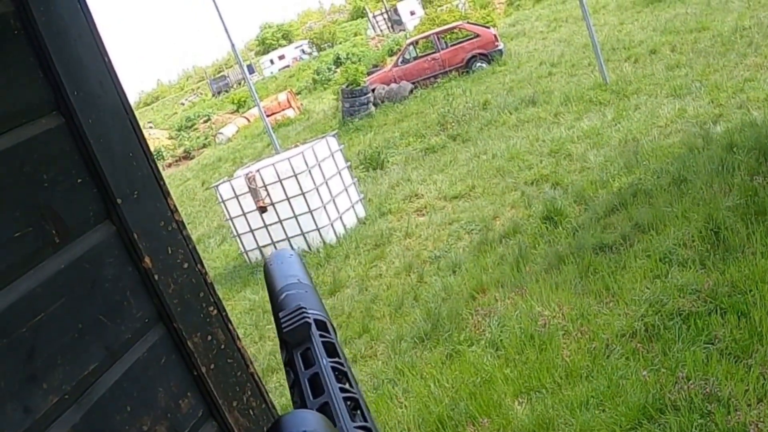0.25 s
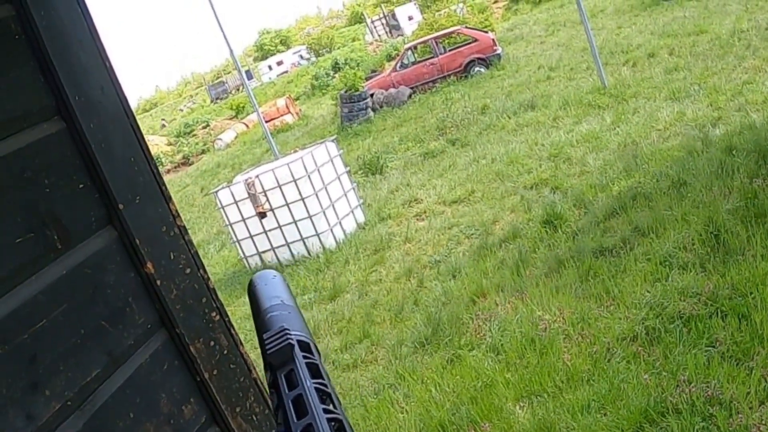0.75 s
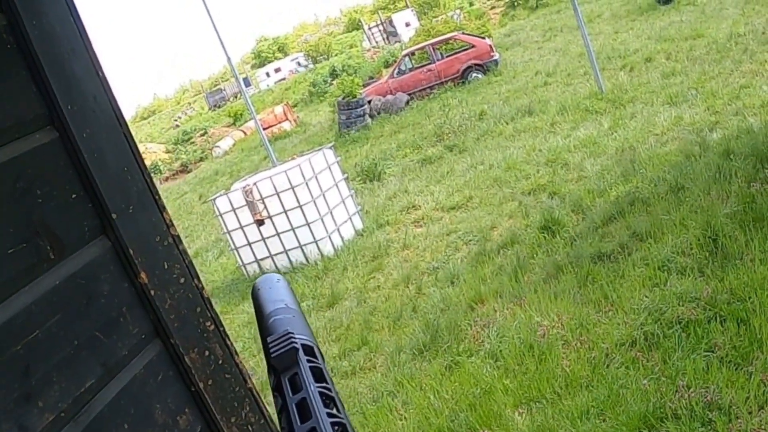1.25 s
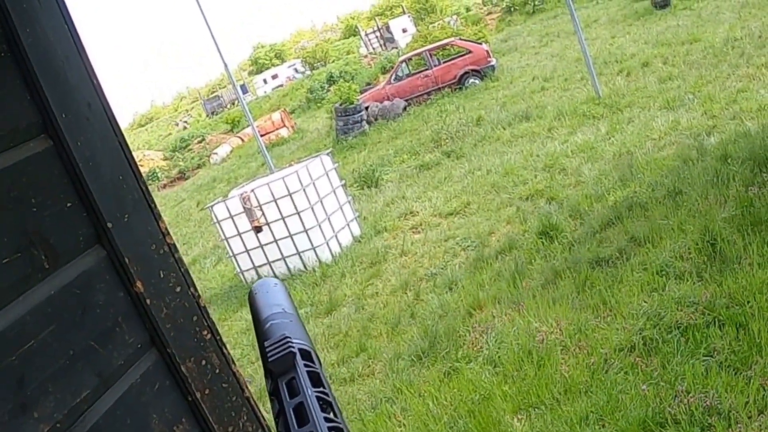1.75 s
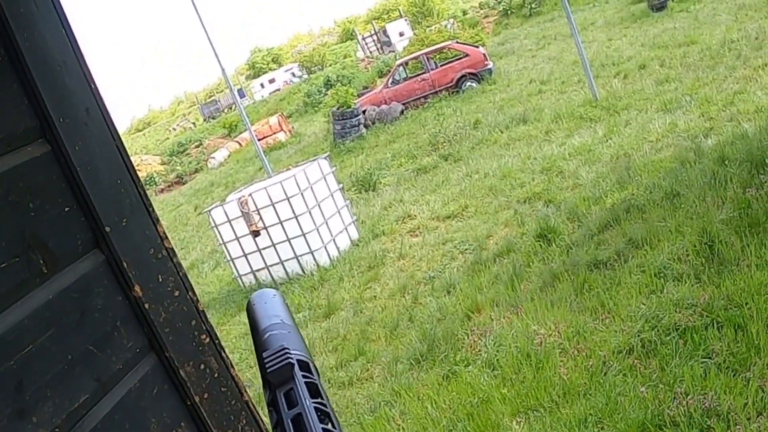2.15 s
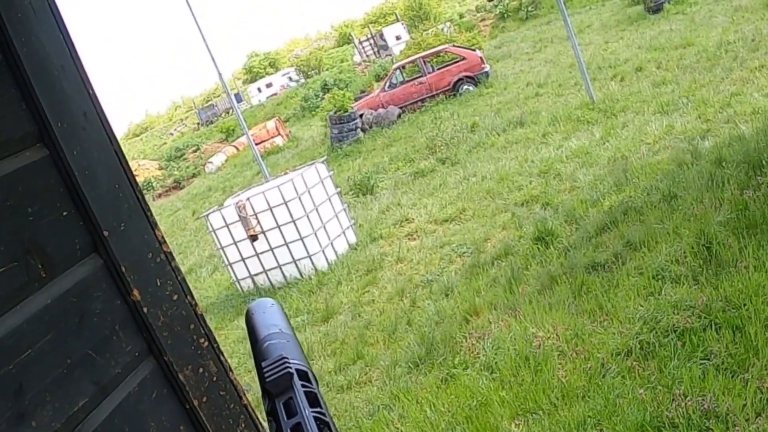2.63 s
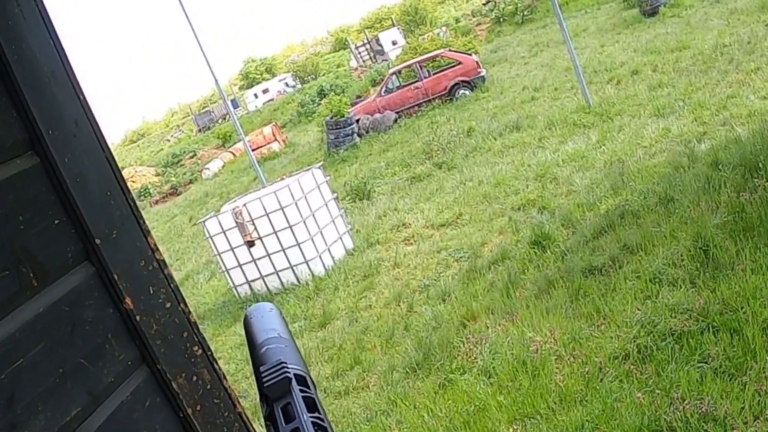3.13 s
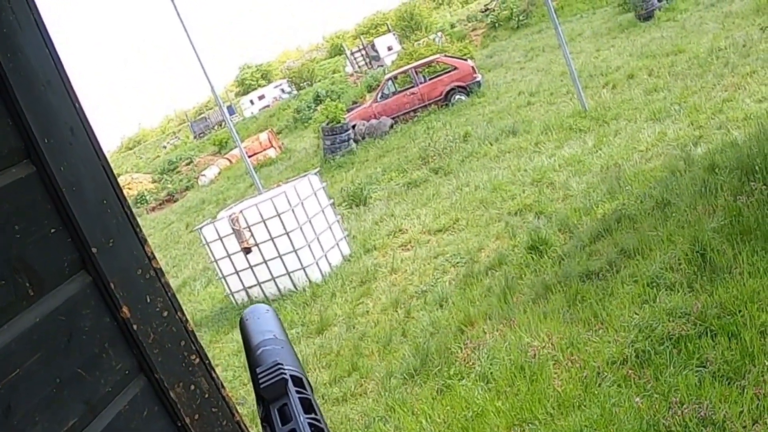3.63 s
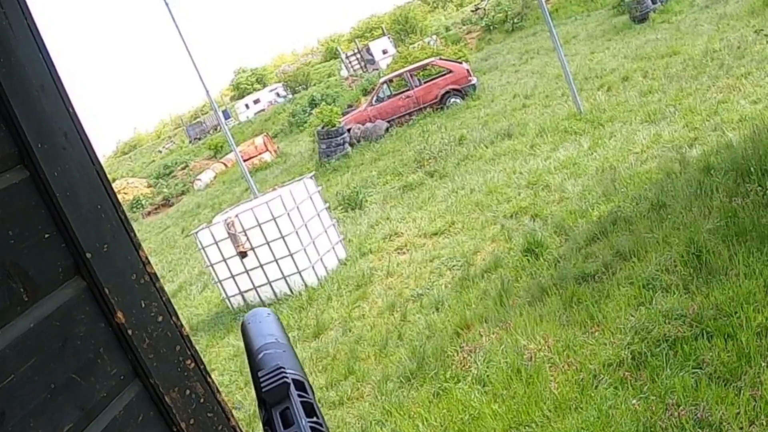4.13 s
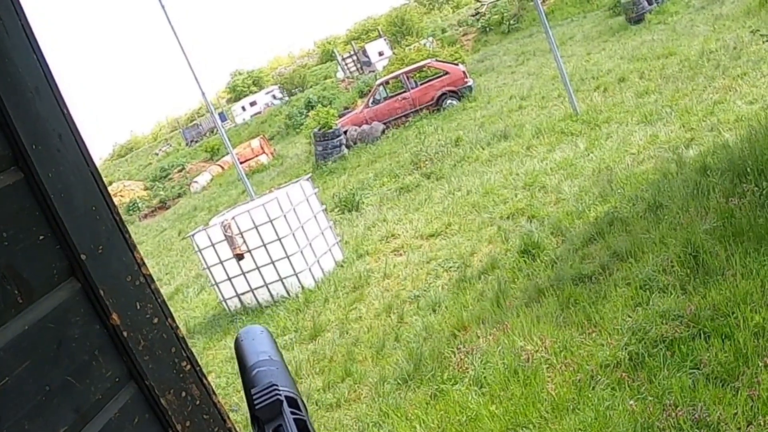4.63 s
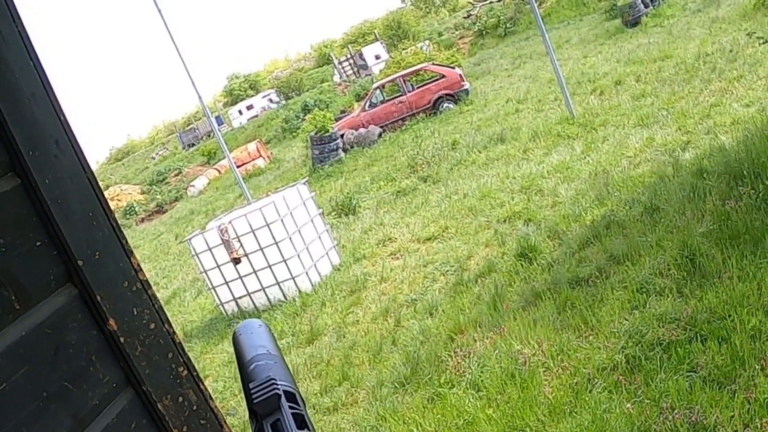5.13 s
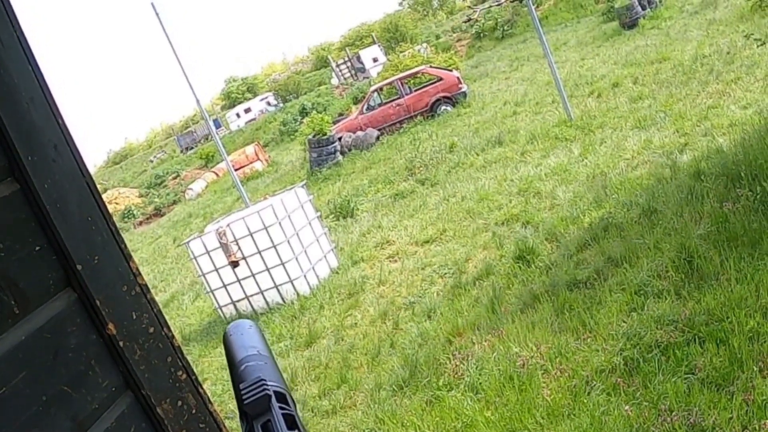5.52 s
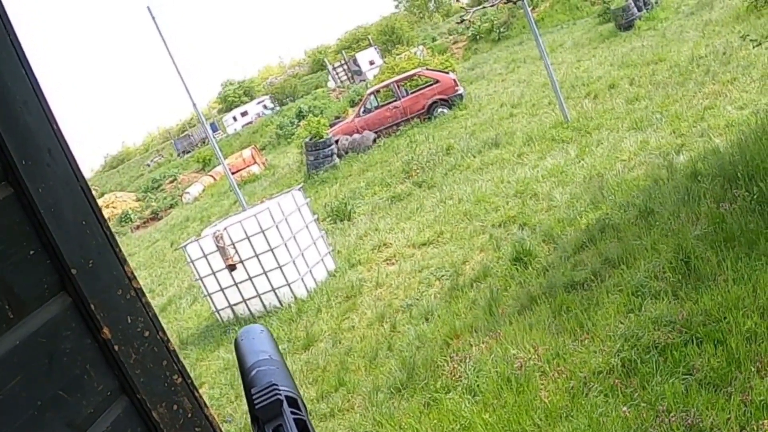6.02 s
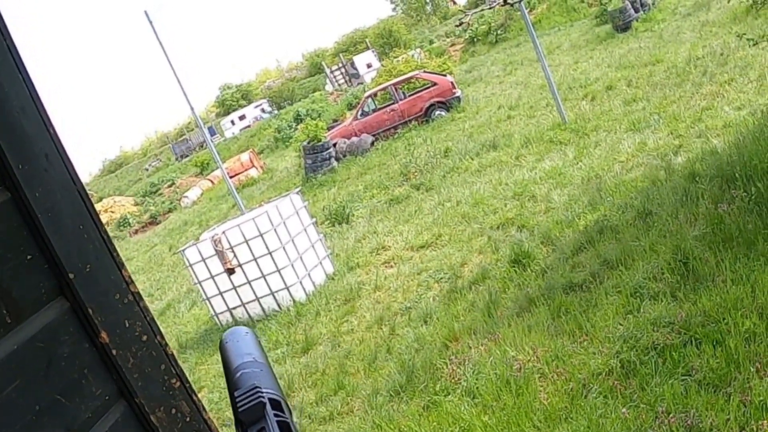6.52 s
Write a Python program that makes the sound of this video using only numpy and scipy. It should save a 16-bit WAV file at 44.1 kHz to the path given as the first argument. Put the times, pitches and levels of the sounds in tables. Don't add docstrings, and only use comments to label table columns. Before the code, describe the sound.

Fast, steady low thumps from a motorised launcher, each wound up by a short gear buzz, with plastic clatter and light handling noise between.

```python
import sys
import numpy as np
from scipy import signal
from scipy.fft import rfft, irfft, next_fast_len
from scipy.io import wavfile
from scipy.ndimage import uniform_filter1d

SR = 44100
rng = np.random.default_rng(int(sys.argv[2]) if len(sys.argv) > 2 else 0)


def file_out(sig):
    cols = np.atleast_2d(sig).T
    lim = np.clip(cols, -1, 1)
    pcm = np.round(lim * 32767).astype(np.int16)
    wavfile.write(sys.argv[1], SR, pcm)


def ratio_of_db(decibels):
    return 10 ** (np.asarray(decibels, float) / 20)


N = 298557

# (piston release [s], motor lead [ms], after-swing [dB],
# tube ring [dB])
PULLS = [(0.1301, 42, -24, -28), (0.3682, 46.4, -14.5, -23), (0.5811, 48.3, -19, -21.5),
         (0.7688, 26, -26, -23), (0.9817, 40, -23, -29), (1.1439, 44, -15.5, -30),
         (1.3316, 43, -18, -23.5), (1.4946, 45.4, -15.5, -27.5), (1.6598, 49, -17.5, -25.5),
         (1.8231, 45, -13.5, -28.5), (2.0375, 43, -18.5, -27.5), (2.2514, 41, -17.5, -30),
         (2.4146, 42, -23, -31), (2.5775, 49, -19, -30.5), (2.7158, 41, -14, -29),
         (2.9065, 65, -11.5, -30),
         (3.0464, 44, -16.5, -27), (3.2361, 36.5, -19, -25), (3.3999, 65, -15, -25.5),
                (3.5631, 46, -13.5, -27), (3.7292, 49, -17.5, -26), (3.8922, 43, -23, -29.5),
                (4.057, 37.4, -22, -24), (4.2462, 45, -14, -24.5), (4.4106, 51, -21.5, -28.5),
                (4.599, 39, -31, -25), (4.7882, 42.5, -17, -24), (4.9542, 41, -18, -31),
                (5.1435, 47.5, -32, -30.5), (5.3332, 43, -21, -22.5), (5.4968, 46, -22, -23.5),
                (5.6867, 36, -29, -25), (5.8784, 38, -20, -24.5), (6.0686, 62, -17, -24),
                (6.2575, 39, -16.5, -25.5), (6.4234, 48, -13.5, -24.5), (6.6143, 50, -20, -22.5)]
CYCLES = PULLS
# (time [s], peak [dB], knock below 500 Hz [dB])
RATTLES = [(0.0853, -5, -17), (0.178, -5, -20), (0.7153, -9.5, -59), (0.908, -32, -44), (1.213, -31, -32),
           (1.242, -38, -40), (1.5807, -17, -40), (1.902, -26.5, -42), (2.5562, -8.5, -16),
           (2.806, -19, -10), (2.8698, -8.5, -22), (2.987, -26, -24), (3.1065, -6.5, -25),
           (3.322, -17, -35), (3.3599, -9.5, -18), (3.587, -20.5, -18), (3.603, -11, -18),
           (3.649, -20.5, -18), (4.4261, -7.5, -26), (4.6948, -7, -38), (4.923, -9, -33),
           (5.1596, -12, -20), (5.4082, -31, -14), (5.5186, -8.5, -20), (5.763, -5.5, -22.5),
           (6.0321, -6, -20), (6.287, -12.5, -35), (6.3487, -21, -20), (6.509, -18.5, -38),
           (6.5377, -5.5, -58)]
THUD_DB, FIRMER_DB_PER_S = -8.5, 0.255


def rms_one(x):
    return x / np.sqrt(np.mean(x ** 2) + 1e-20)


def at_hz(points, hz):
    point_hz, value = np.array(points).T[:2]
    return np.interp(np.log(hz), np.log(point_hz), value)


def add(track, s, piece):
    i = max(int(s * SR), 0)
    track[i:i + len(piece)] += piece[:max(N - i, 0)]


def band(x, low_hz, high_hz):
    return signal.sosfilt(signal.butter(2, [low_hz, high_hz], "band", fs=SR, output="sos"), x)


def band_noise(white, first_hz, second_hz):
    return rms_one(band(band(white, *first_hz), *second_hz))


def flicker(rate_hz, depth_db):
    r = np.exp(-2 * np.pi * rate_hz / SR)
    wander = rms_one(signal.lfilter([1], [1, -2 * r, r * r], rng.standard_normal(N)))
    return ratio_of_db(depth_db * 1.4 * np.tanh(wander / 1.4))


def grit(rate_per_s, length_ms, level_db):
    grains = (rng.random(N) < rate_per_s / SR) * np.minimum(rng.exponential(1, N), 3)
    r = np.exp(-1000 / (length_ms * SR))
    fading = signal.lfilter([1], [1, -r], grains + 1e-18)
    return rms_one(1 + ratio_of_db(level_db) * uniform_filter1d(fading, size=30))


def swell(s, level_db, rise_db_per_s, fade_db_per_s):
    late = np.arange(0, N + 64, 64) / SR - np.array(s)[:, None]
    slope_db = np.minimum(rise_db_per_s * late, -fade_db_per_s * late)
    coarse = ratio_of_db(np.array(level_db)[:, None] + slope_db).sum(axis=0)
    return np.interp(np.arange(N) / 64, np.arange(len(coarse)), coarse)


def port_noise():
    # (frequency [Hz], level [dB per Hz])
    left_colour = [(300, -62.5), (700, -74), (1100, -68), (1800, -69), (2150, -80), (2700, -66.5),
                   (3800, -73), (5000, -78.5), (5600, -89), (7400, -87), (8600, -95), (10500, -100),
                   (13000, -105), (15600, -114)]
    right_colour = [(300, -78), (700, -73), (1100, -72.5), (1800, -69), (2150, -81), (2700, -74),
                    (4000, -80), (4800, -68), (5400, -79), (6600, -85), (7900, -108), (9500, -100),
                    (12500, -108), (15600, -120)]
    # (frequency [Hz], left-right likeness [0-1])
    likeness = [(300, 0.27), (700, 0.57), (1300, 0.8), (2100, 0.63), (3000, 0.8), (4200, 0.47),
                (6000, 0.47), (9000, 0.15)]
    # (frequency [Hz], left port lead [rad])
    left_lead = [(0, 0), (1890, 0.51), (2240, -2.5), (3450, -0.5), (4910, -2.5), (5940, -1.5), (6630, -5.5),
                 (7060, -11), (8100, -3), (9910, 6), (11500, -33.5), (15200, -7)]
    size = next_fast_len(N)
    hz = np.maximum(np.arange(size // 2 + 1) * SR / size, 1)
    shared, own = rfft(rng.standard_normal((2, size)))
    alike = np.clip(at_hz(likeness, hz), 0, 1)
    left = shared * ratio_of_db(at_hz(left_colour, hz))
    right = alike * shared * np.exp(-1j * at_hz(left_lead, hz)) + np.sqrt(1 - alike ** 2) * own
    right = right * ratio_of_db(at_hz(right_colour, hz))
    return rms_one(irfft(np.array([left, right]) * (hz > 350), size)[:, :N])


def shell(x, patchy_db):
    # (frequency [Hz], width [Hz], level [dB])
    resonances = [(1200, 76, 9), (1000, 77, 0.5), (1783, 147, 0.5), (2420, 130, 2), (3105, 55, -1),
                  (3603, 225, 1.5), (4243, 59, 3), (4887, 170, 0), (1423, 34, -5.5), (2894, 38, -9.5),
                  (5100, 85, -3.5), (5670, 120, -7.5), (7160, 750, -4), (9060, 170, -2)]
    out = x.copy()
    for hz, width_hz, level_db in resonances:
        r = np.exp(-np.pi * width_hz / SR)
        feedback = [1, -2 * r * np.cos(2 * np.pi * hz / SR), r * r]
        fed = x * flicker(26, patchy_db)
        out += ratio_of_db(level_db) * signal.lfilter((1 - r * r) / 2 * np.array([1, 0, -1]), feedback, fed)
    return out


def handling():
    # (time [s], hiss [dB], grip rumble [dB])
    slips = [(0.02, -31.5, -49), (0.148, -14.5, -57), (0.659, -24, -53), (0.808, -22, -63),
             (1.199, -43, -36), (1.66, -49, -27.5), (1.92, -53, -49), (2.24, -44, -59), (2.41, -42, -43),
             (2.5, -41.5, -54), (2.78, -39, -55), (2.98, -45, -36), (3.22, -28.5, -45), (3.42, -36, -34),
             (3.599, -30, -30), (4.05, -59, -57), (4.33, -44, -39), (4.662, -24.5, -52), (4.92, -24.5, -29),
             (5.22, -34, -62), (5.45, -36.5, -31), (5.721, -30.5, -43), (5.9, -33.5, -33), (5.99, -33, -48),
             (6.14, -50, -39), (6.319, -26.5, -38), (6.51, -30, -30.5), (6.66, -63, -32),
             (6.76, -35.5, -72)]
    slip_s, hiss_db, rumble_db = np.transpose(slips)
    rise_db_per_s, fade_db_per_s, linger_fade_db_per_s = 149.5, 204, 95
    breeze = ratio_of_db(-48.5) * np.clip((np.arange(N) / SR - 2.12) / 0.4, 0, 1)
    hiss = ratio_of_db(-65.5) + breeze + swell(slip_s, hiss_db, rise_db_per_s, fade_db_per_s)
    rumble = ratio_of_db(-59) + swell(slip_s, rumble_db, rise_db_per_s, fade_db_per_s)
    release, lead, after_db, tube_db = np.transpose(CYCLES)
    low = ratio_of_db(-43) + swell(release + 0.020, after_db - 10.5, 520.0, linger_fade_db_per_s)
    low = low + swell([0.14], [-22.5], 60., linger_fade_db_per_s)
    return hiss, rumble, low


def rattle_level(rise_ms, decay_ms):
    out, ms = np.zeros(N), np.arange(int(.15 * SR)) / SR * 1000
    burst = (1 - np.exp(-ms / rise_ms)) ** 2 * np.exp(-ms / decay_ms)
    for s, peak_db, knock_db in RATTLES:
        add(out, s, ratio_of_db(peak_db - 11.0) * burst)
    return out


def gear_level(start_db, rise_ms):
    gear_db, wind_db, slam_db = -32.5, -2.5, 3
    slam_end_ms, run_down_ms, run_down_db_per_ms, tail_db_per_ms = 31.8, 55, 0.53, 0.6
    crack_ms, crack_db, crack_fade_ms = 16, -2.5, 4.3
    down_ms = slam_end_ms + run_down_ms
    down_db = slam_db - run_down_db_per_ms * run_down_ms
    slam = [(-18.5, wind_db), (7.2, slam_db), (slam_end_ms, slam_db),
            (down_ms, down_db), (down_ms + 100, down_db - 100 * tail_db_per_ms)]
    out = np.zeros(N)
    for s, lead, after_db, tube_db in CYCLES:
        wind = [(-lead, -40), (-lead + rise_ms, start_db), (-.6 * lead, wind_db)]
        ms = np.arange(-lead, 200, 1000 / SR)
        level_db = gear_db + np.interp(ms, *np.array(wind + slam).T)
        crack = ratio_of_db(crack_db) * (ms > crack_ms) * np.exp(-np.abs(ms - crack_ms) / crack_fade_ms)
        add(out, s - lead / 1000, ratio_of_db(level_db) * (1 + crack))
    return uniform_filter1d(out, size=40)


def strike(modes, times, levels_db, spread_db, soft_hz):
    out, at = np.zeros(N), np.clip((np.array(times) * SR).astype(int), 0, N - 1)
    for hz, level_db, t60 in modes:
        clicks, draw = np.full(N, 1e-18), rng.standard_normal((len(at), 2))
        blows = ratio_of_db(levels_db + level_db + spread_db * draw[:, 0]) * np.sign(draw[:, 1])
        np.add.at(clicks, at, blows)
        r, w = ratio_of_db(-60 / (t60 * SR)), 2 * np.pi * hz / SR
        out += signal.lfilter([0, np.sin(w)], [1, -2 * r * np.cos(w), r * r], clicks)
    return signal.sosfilt(signal.butter(6, soft_hz, fs=SR, output="sos"), out)


def knocks(jitter_ms):
    # (frequency [Hz], level [dB], t60 [s])
    tube_modes = [(1193.7, 2.5, 0.091), (1257, -17.5, 0.2), (990, -26, 0.23), (1810, -14, 0.02),
                  (2990, -25, 0.13), (3510, -4, 0.016), (2605, -6.5, 0.024), (944, -11.5, 0.067)]
    handle_modes = [(250.2, -6.5, 0.22), (289.7, -4.5, 0.093), (204, 0.5, 0.017)]
    grip_modes = [(246.7, -2.5, 0.068), (282.6, -7.5, 0.056), (373, -22, 0.15), (196, -3, 0.031),
                  (440, -11, 0.042), (461, -13, 0.027)]
    # (time after release [ms], tube [dB], grip [dB])
    contacts = [
        (-30.5, -13, -7.5),
        (-20, -37, -1),
        (11, -0.5, 2.5),
        (17, -1.5, 2.5),
        (30.5, -32, 8.5),
        (42.5, -11, 1),
        (61.5, -16.5, -1),
    ]
    contact_ms, contact_tube_db, contact_grip_db = np.transpose(contacts)
    release, lead, after_db, tube_db = np.array(CYCLES).T[..., None]
    jitter = jitter_ms * rng.standard_normal((len(CYCLES), len(contacts)))
    times = (release + (contact_ms + jitter) / 1000).ravel()
    tube_level = (tube_db + contact_tube_db + 2.66).ravel()
    grip_level = (THUD_DB + FIRMER_DB_PER_S * release + contact_grip_db - 18.5).ravel()
    tube = strike(tube_modes, times, tube_level, spread_db=1.5, soft_hz=3670)
    grip = strike(grip_modes, times, grip_level, spread_db=2.0, soft_hz=585)
    motor_on = (release - lead / 1000).ravel() + 0.0021
    start = strike(handle_modes, motor_on, np.full(len(CYCLES), -25.), spread_db=3.5, soft_hz=510)
    rattle_s, peak_db, knock_db = np.transpose(RATTLES)
    light_db = np.minimum(knock_db, -20) - 1.5
    loose = strike(handle_modes, rattle_s, light_db, spread_db=0.5, soft_hz=380)
    return tube, grip + start + loose


def thuds(late_ms, spread_db):
    # (time after release [ms], signed height, start [Hz], end [Hz], rise [ms], decay [ms])
    swings = [
        (.4, .41, 94.2, 86.4, 3.5, 32.3),
        (10.2, 1.99, 142.4, 20.1, 24.4, 12.7),
        (21.1, .96, 69.2, 47.2, 7.7, 13.5),
        (32.5, -.55, 156.3, 179.7, 4.6, 11.9),
        (49.5, .17, 55.3, 76.2, .6, 38.3),
        (11.9, .11, 250, 240, .6, 6.5),
        (42.3, .08, 290, 280, .6, 5.5),
    ]
    out, ms = np.zeros(N), np.arange(int(.3 * SR)) / SR * 1000
    draws = rng.standard_normal((len(CYCLES), len(swings), 2))
    for (s, lead, after_db, tube_db), draw in zip(CYCLES, draws):
        peak_db = THUD_DB + FIRMER_DB_PER_S * s
        for (start, height, hz0, hz1, rise, decay), (dt, dg) in zip(swings, draw):
            turns = (hz1 * ms + (hz0 - hz1) * 25 * (1 - np.exp(-ms / 25))) / 1000
            envelope = (1 - np.exp(-ms / rise)) * np.exp(-ms / decay)
            swing = height * np.sin(2 * np.pi * turns) * envelope
            level_db = after_db + 19.5 if start > 45 else peak_db + 7.5
            when = s + (start + late_ms * dt * start / 50) / 1000
            add(out, when, swing * ratio_of_db(level_db + spread_db * dg))
    return out


def whines():
    # (time [s], length [s], start [Hz], end [Hz], level [dB])
    tones = [
        (2.508, 0.076, 920, 1200, -45),
        (2.815, 0.037, 1450, 1540, -44),
        (4.874, 0.051, 1430, 1450, -41),
        (5.10, 0.021, 1000, 1250, -40),
        (5.951, 0.053, 1146, 1340, -37.5),
        (6.699, 0.12, 1078, 1530, -42),
        (6.203, 0.032, 1000, 1200, -41),
    ]
    out = np.zeros(N)
    for s, length, hz0, hz1, level_db in tones:
        hz = np.linspace(hz0, hz1, int(length * SR))
        tone = np.sin(2 * np.pi * np.cumsum(hz) / SR)
        add(out, s, ratio_of_db(level_db) * np.hanning(len(hz)) ** 0.37 * tone)
    return out * flicker(60, 5.5)


def scene():
    hiss, rumble, low = handling()
    rattles = rattle_level(rise_ms=2.26, decay_ms=10.46)
    gears = gear_level(start_db=-21, rise_ms=0.58)
    tube, grip = knocks(jitter_ms=2.5)

    shake = gears * grit(rate_per_s=260, length_ms=1.6, level_db=-4.5)
    shake = shake + rattles * flicker(300, 2.2)
    shake = shake + hiss * ratio_of_db(-13.5) * flicker(16.4, 4.2) * grit(90, 1.9, 2.1)
    bright = (gears / gears.max()) ** 1.03 * gears.max() + rattles * ratio_of_db(-4.5) + hiss * ratio_of_db(-18)
    noise = port_noise()
    dull = signal.sosfilt(signal.butter(4, 6200, fs=SR, output="sos"), noise)
    top = signal.sosfilt(signal.butter(4, 6200, "high", fs=SR, output="sos"), noise)
    housing = shell(dull * shake + top * bright * flicker(90, 0.89), patchy_db=6.0)

    white = rng.standard_normal((4, N))
    grip = grip + (rumble + gears * ratio_of_db(-6)) * band_noise(white[0], (180, 320), (180, 320))
    sway = thuds(late_ms=0.44, spread_db=1.5)
    sway = sway + np.minimum(low, ratio_of_db(-25)) * band_noise(white[1], (43, 86.6), (22, 150))
    sway = sway + gears * ratio_of_db(-2.5) * rms_one(band(white[3], 22, 76))

    skew = band_noise(white[2], (220, 420), (220, 420)) * (rumble + gears) * ratio_of_db(-11)
    skew = skew - np.gradient(grip) * ratio_of_db(14.5)
    skew = skew + band(sway, 12, 60) * ratio_of_db(-18.5) + (sway + grip) * ratio_of_db(-20.5)
    body = sway + grip + skew * [[1], [-1]]
    tones = (tube + whines()) * ratio_of_db(np.array([[1.8], [-2.2]]))
    return body + tones + housing * ratio_of_db(-3.5)


def top_cut(x):
    return signal.sosfilt(signal.butter(12, 15690, fs=SR, output="sos"), x)


def record(dry):
    rounded = .9 * np.tanh(dry / .9)
    mix = signal.sosfilt(signal.butter(1, 8, "high", fs=SR, output="sos"), rounded)
    return top_cut(mix)


dry = scene()
out = record(dry)
file_out(out)
```